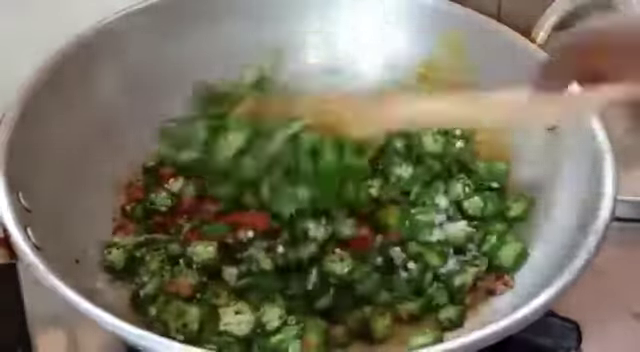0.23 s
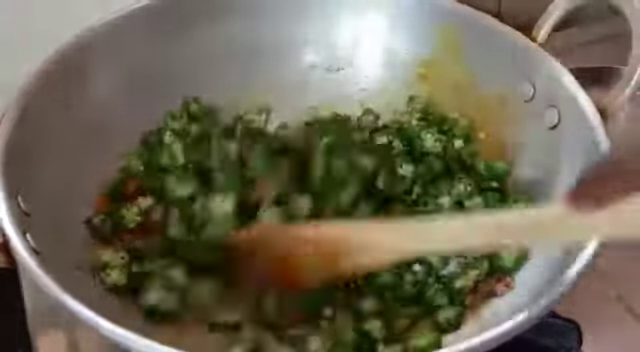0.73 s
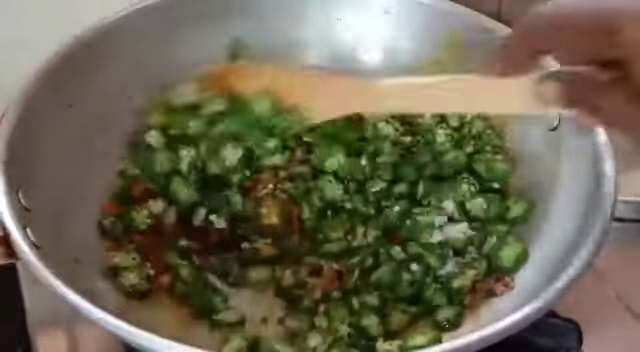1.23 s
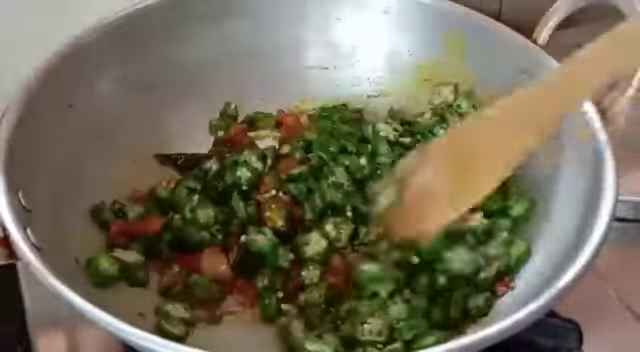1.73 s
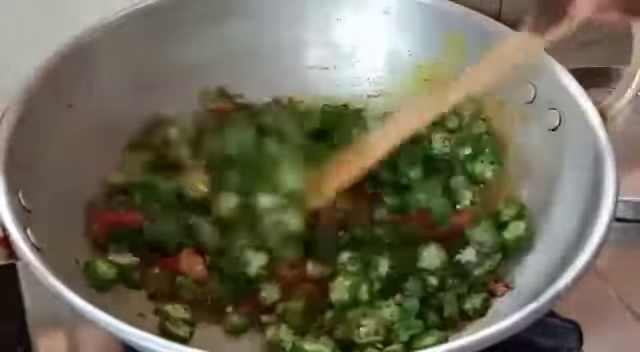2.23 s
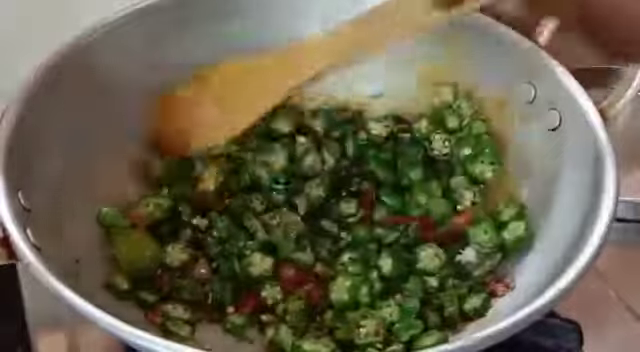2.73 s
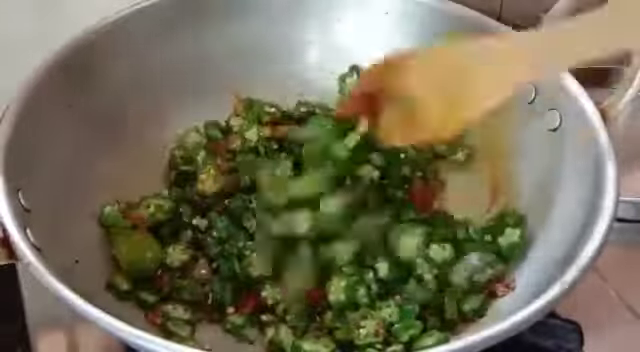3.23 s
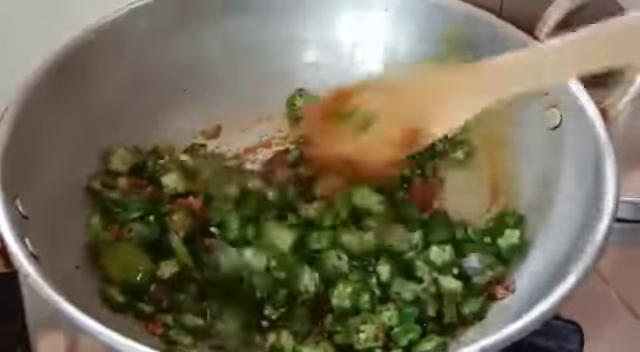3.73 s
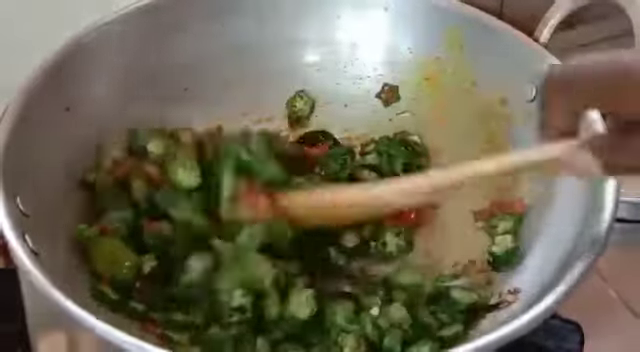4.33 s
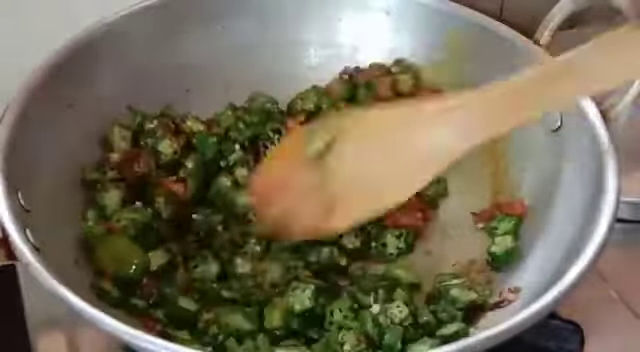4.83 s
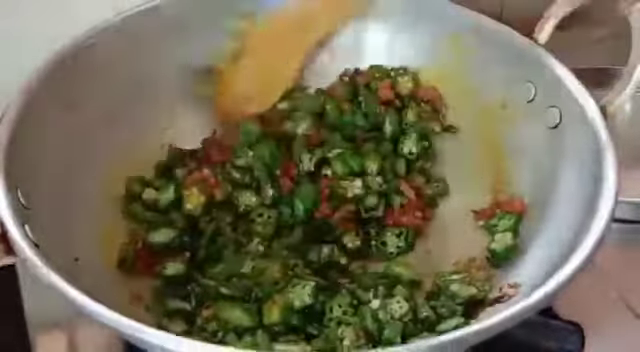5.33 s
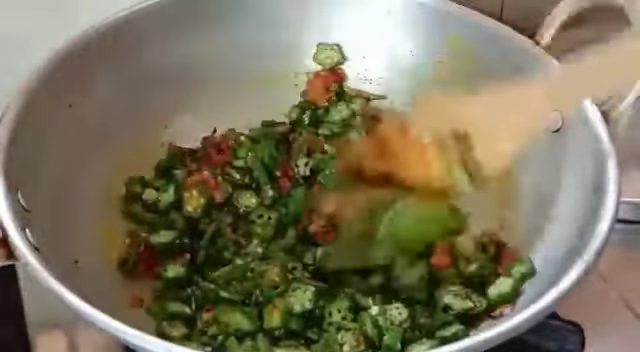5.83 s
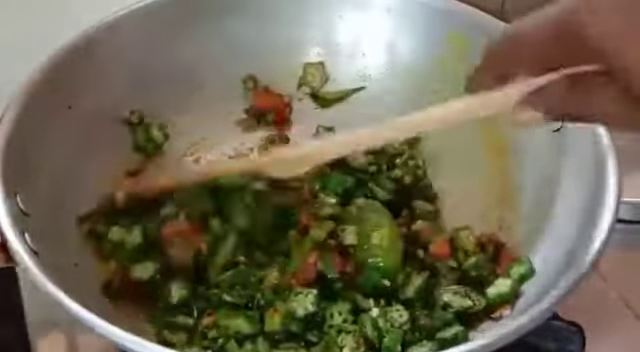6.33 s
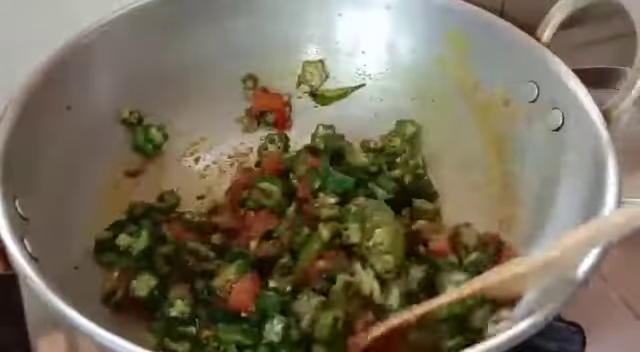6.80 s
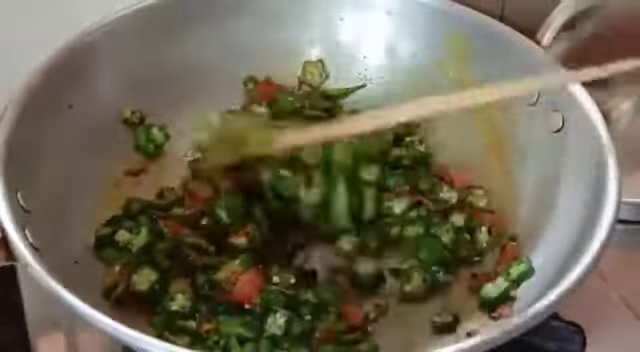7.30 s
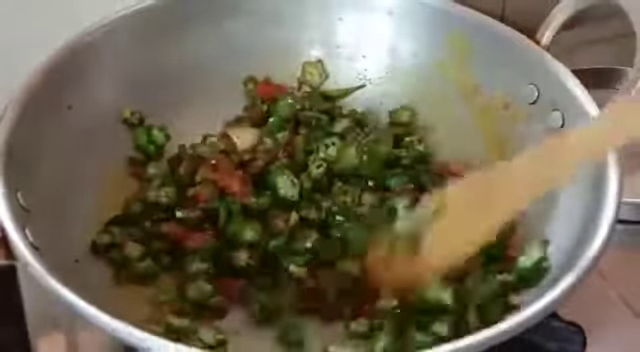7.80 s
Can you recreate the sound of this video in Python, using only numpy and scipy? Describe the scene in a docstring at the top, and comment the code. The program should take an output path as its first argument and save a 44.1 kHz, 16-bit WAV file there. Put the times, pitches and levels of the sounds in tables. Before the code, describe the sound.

Close over a kitchen stove, a wooden spatula stirs vegetables in a deep metal pan. Its edge scrapes across the metal in uneven strokes and now and then knocks it, giving a dull, short ring. The stirring eases for a while, then returns with sharper knocks. Oil sizzles softly throughout, rising as the food is turned, over a very faint hum and rumble.

```python
"""A kitchen, close over the stove: a wooden spatula stirs vegetables in a deep metal pan.
Its edge judders across the metal and now and then knocks it; both ring the pan's food-damped modes.
Oil sizzles and spits, louder where the food is turned over. A mains hum and a low rumble lie beneath,
and nearby tiles throw back a very short stereo echo."""
import sys
import numpy as np
from scipy import signal
from scipy.fft import rfft, irfft, next_fast_len
from scipy.io import wavfile
from scipy.ndimage import uniform_filter1d

SR = 44100
rng = np.random.default_rng(int(sys.argv[2]) if len(sys.argv) > 2 else 0)


def persist_wave(psi):
    """Save psi, clipped to +-1, as 16-bit WAV."""
    counts = np.round(np.clip(psi, -1, 1) * 32767).astype(np.int16)
    wavfile.write(sys.argv[1], SR, np.atleast_2d(counts).T)


N = 355446

# The ring of the loaded pan. Each row: pitch in Hz, ring time (t60) in seconds, gain in dB.
PAN_MODES = [(99, 0.16, -13.5), (146, 0.034, -11), (197.2, 0.13, -3.5), (228.6, 0.048, -6.5),
             (269, 0.11, -5), (314, 0.076, -10), (327.8, 0.083, -6.5), (372, 0.32, -18),
             (408.3, 0.13, -13.5), (439.5, 0.2, -12), (477.6, 0.16, -15.5), (561, 0.037, -11.5),
             (594.4, 0.063, -12), (642, 0.048, -9), (681.3, 0.046, -9), (794, 0.057, -10.5),
             (839.5, 0.12, -11), (849.4, 0.068, -10), (887, 0.048, -10), (996, 0.025, -15.5),
             (1078, 0.083, -16.5), (1113, 0.037, -18), (1222, 0.019, -15.5), (1210, 0.017, -23),
             (1369, 0.054, -21), (1544, 0.029, -20.5), (1809, 0.015, -24.5)]
# Spatula strokes. Each row: moment of full pressure in seconds, nominal swell in ms, hold in ms,
# nominal fade in ms, then peak drive in dB for the low, middle and high modes and for fresh sizzle.
STROKES = [(0.0, 50, 68, 170, -46, -41.5, -47.5, -51.5), (0.27, 670, 300, 200, -76.5, -73, -60, -64),
           (0.771, 72, 61, 150, -36, -32.5, -40.5, -51), (0.892, 150, 38, 143, -36.5, -29.5, -33, -50),
           (0.958, 100, 38, 95, -53, -40.5, -42, -54), (1.18, 170, 110, 200, -79, -56.5, -53, -62.5),
           (1.358, 89, 10, 100, -64, -58, -76, -67), (1.498, 160, 26, 78, -84, -88, -61.5, -69),
           (1.68, 110, 57, 100, -78, -70, -74, -61), (1.743, 65, 14, 160, -50, -42.5, -52, -56.5),
           (2.138, 70, 53, 150, -80, -68, -69, -55), (2.245, 120, 22, 66, -57, -61.5, -52.5, -54),
           (3.049, 68, 100, 85, -63, -54, -62, -63.5), (3.11, 60, 27, 110, -60, -51.5, -68, -61),
           (3.424, 29, 35, 200, -60, -41.5, -40.5, -55), (3.788, 102, 14, 88, -49, -52.5, -50, -60),
           (3.96, 39, 47, 180, -66, -51.5, -51.5, -59), (4.309, 26, 79, 80, -46.5, -42.5, -44, -53),
           (4.533, 83, 21, 155, -48.5, -40, -45, -55), (4.688, 110, 78, 130, -60, -70.5, -66.5, -71),
           (5.08, 130, 74, 170, -63, -55.5, -56, -67), (5.198, 100, 35, 100, -68, -62, -58.5, -69),
           (5.334, 73, 40, 190, -70, -47, -50, -57), (5.43, 60, 15, 100, -66, -56, -55.5, -57),
           (5.555, 24, 62, 140, -39.5, -37, -43, -53), (5.772, 43, 19, 150, -72, -53.5, -68, -71),
           (6.078, 18, 10, 105, -62, -45, -39.5, -53.5), (6.158, 80, 46, 120, -70, -65, -53, -63),
           (6.488, 80, 26, 134, -47, -42, -45, -52.5), (6.81, 160, 36, 140, -54, -54.5, -54, -67),
           (6.92, 160, 36, 200, -71, -59.5, -65, -61.5), (7.08, 450, 45, 160, -69, -67, -56.5, -56),
           (7.158, 79, 25, 198, -36.5, -35.5, -37.5, -53), (7.238, 120, 45, 70, -67, -42.5, -50.5, -56.5),
           (7.768, 186, 67, 160, -50, -53.5, -56, -52), (7.851, 46, 80, 150, -34.5, -37, -41, -50.5),
           (7.952, 100, 53, 200, -42, -41.5, -45.5, -53.5)]
# Sharp accents in the stirring: knocks and sudden surges within a scrape.
# Each row: start in seconds, then the strength in dB of jolt, tick and low thud.
ACCENTS = [(0.038, -44, -60, -43), (0.746, -39, -64, -49), (0.802, -31, -57, -48), (1.721, -43, -66, -60),
           (3.045, -45.5, -64, -55), (3.419, -34, -33, -50), (3.532, -47, -49, -75),
           (3.957, -41.5, -41.5, -73), (4.308, -41.5, -43.5, -57), (4.346, -35.5, -47, -37),
           (4.533, -33.5, -43, -41), (5.323, -50, -64, -63), (5.552, -33.5, -55, -34.5),
           (5.75, -50.5, -65, -50), (6.077, -36.5, -36.5, -47), (6.46, -48, -63, -44),
           (6.806, -44.5, -51, -67), (7.059, -51, -58, -70), (7.113, -41, -42, -40),
           (7.155, -35.5, -60, -37), (7.81, -52, -59, -42), (7.841, -35.5, -40, -42)]
# Food settling between strokes: drive in dB for the low, middle and high modes.
SETTLING_DB = [-78, -73.5, -74]
# Four edges in Hz: low modes cross into middle over the first pair, middle into high over the second.
CROSSFADES_HZ = [250, 320, 720, 780]
# The bed of steady frying. Each row: time in seconds, level in dB.
FRYING_LEVELS = [(0, -59), (0.18, -63.5), (0.3, -57.5), (0.68, -64.5), (1.1, -63), (1.55, -63.5),
                 (1.9, -63), (2.07, -67.5), (2.33, -60), (2.65, -63), (3.2, -60.5), (3.9, -61), (4.2, -61),
                 (4.85, -64), (5.3, -62.5), (5.5, -58), (6.4, -60.5), (7.05, -61.5), (7.4, -62),
                 (7.62, -66.5), (8.06, -56.5)]
# Tone of the hot oil. Each row: frequency in Hz, gain in dB.
SIZZLE_EQ = [(880, -4), (1500, -33), (1720, -10), (1920, -9.5), (2260, -2.5), (3870, 0), (4750, -3),
             (5670, -4), (6690, -13.5), (7300, -18.5), (8540, -13.5), (9420, -17), (9990, -21),
             (11900, -26.5), (15500, -26.5)]
# The pan's hollow. Each row: pitch in Hz, ring time (t60) in seconds, gain in dB on the frying's drive.
HOLLOW_MODES = [(839, 0.084, -14.5), (884.5, 0.072, -17.5), (1216, 0.044, -19)]
# The loudest spits of oil. Each row: start in seconds, strength in dB, pitch in Hz.
OIL_SPITS = [(0.024, -49, 8220), (0.0518, -49, 8700), (0.7597, -51, 8520), (2.166, -53, 8870),
             (2.2423, -53, 8440), (4.3884, -57, 8640), (6.4727, -50, 8620), (6.4981, -54, 8130),
             (6.9386, -49.5, 8560), (7.0489, -53, 8260), (7.1097, -57, 8300), (7.1796, -54, 8270),
             (7.231, -55, 8000), (7.8201, -45.5, 8160)]
# Tone of the kitchen rumble. Each row: frequency in Hz, gain in dB.
RUMBLE_EQ = [(15, -40), (30, -13), (45, -12), (100, 5), (160, -1), (600, -13.5), (1000, -16), (1300, -25),
             (1550, -33), (2000, -23), (2600, -50)]
# Colour of the two microphone ports. Each row: frequency in Hz, left minus right in dB.
PORT_BALANCE = [(60, -1.0), (110, -1.0), (200, -1.0), (380, -1.5), (700, -0.5), (1290, 4.5), (2380, 0.0),
                (4400, 0.0), (8120, 0.0), (15000, -0.5)]
# Tone of the noise floor. Each row: frequency in Hz, gain in dB.
HISS_EQ = [(1500, -4), (3000, -1.5), (6000, -1), (8000, -17), (11500, -24.5), (13700, -38), (14600, -9),
           (15500, -6)]
# Steepness of a stroke's swell and fade, for the low, middle and high modes and the sizzle.
SWELL_SLOPES, FADE_SLOPES = [1.16, 1.43, 1.18, 0.71], [1.26, 1.11, 1.07, 0.64]


def pan(drive_db, contact_db=3.0):
    """Slips and accents shake every mode; the moving contact point favours now one, now another."""
    slips = clicks(per_s=500, scatter_db=2.5)
    jolts, thuds = accent_bursts(column=1), accent_bursts(column=3)
    out = 0
    for k, (hz, t60, db) in enumerate(PAN_MODES):
        low = np.interp(hz, CROSSFADES_HZ[:2], [1, 0])
        high = np.interp(hz, CROSSFADES_HZ[2:], [0, 1])
        stroke_db = np.array([low, 1 - low - high, high]) @ drive_db
        # tumbling food blurs the slips, for each mode in its own way
        blurred = slips + 0.58 * rng.standard_normal(N)
        rub = blurred * undb(stroke_db - 5.5 + contact_db * walk(20))
        accent = (low * thuds + (1 - low) * jolts) * undb(0.5 + 2.6 * high + contact_db * walk(20))
        out = out + (-1) ** k * undb(db) * ring(rub + accent, hz, t60)
    return butter(out, 3, 95, "high")  # a pan this small radiates little deep bass


def stirring():
    """Strokes swell, hold and fade over a resting bed: dB curves for three mode groups and the sizzle."""
    t = np.arange(0, N + 44, 44) / SR
    settling = [np.full(len(t), db) for db in SETTLING_DB]
    frying = np.interp(t, *np.transpose(FRYING_LEVELS))
    power = undb(settling + [frying]) ** 2
    for peak_s, swell_ms, hold_ms, fade_ms, *peak_db in STROKES:
        ms = 1000 * (t - peak_s)
        before = np.maximum(-ms, 0) / swell_ms
        after = np.maximum(ms - hold_ms, 0) / fade_ms
        drop_db = 30 * (np.outer(SWELL_SLOPES, before) + np.outer(FADE_SLOPES, after))
        power += undb(np.array(peak_db)[:, None] - drop_db) ** 2
    return np.array([np.interp(np.arange(N) / SR, t, db) for db in 10 * np.log10(power)])


def accent_bursts(column):
    """Each accent is a sharp attack, then a quick chatter of the blade."""
    hits = accent_impulses(column)
    decay = np.exp(-np.arange(2000) / SR / 0.0032)
    chatter = rng.standard_normal(N) * signal.fftconvolve(hits, decay)[:N]
    # wood is soft: the attack spreads over a quarter of a millisecond
    return uniform_filter1d(2 * hits + chatter, size=12)


def edge_ticks():
    """The hard wooden edge puts a short, bright crack on each accent."""
    t = np.arange(3000) / SR
    decay = np.exp(-t / 0.001) + 0.45 * np.exp(-t / 0.021)
    crack = rng.standard_normal(N) * signal.fftconvolve(accent_impulses(column=2), decay)[:N]
    return undb(2) * butter(crack, 3, [2000, 4200], "band")


def sizzle(level_db, ring_cycles=200):
    """Brief high pings and crackle over fine hiss; each third-octave flickers, the treble also as one."""
    pings = sum(ring(clicks(per_s=10, scatter_db=0.46), hz, ring_cycles / hz) * np.sqrt(hz)
                for hz in 2000 * 6 ** rng.random(72))
    hiss = rng.standard_normal(N)
    crackle = clicks(per_s=900, scatter_db=0.65)
    oil = colour(hiss + 0.72 * crackle + 0.55 * unit(pings), SIZZLE_EQ)
    out, treble_db = 0, 2 * walk(14)
    for hz in 1400 * 2 ** np.arange(0, 3.6, 1 / 3):
        band = signal.butter(2, [hz / 2 ** (1 / 6), hz * 2 ** (1 / 6)], "band", fs=SR, output="sos")
        flicker_db = 1.87 * walk(18) + (hz > 6500) * treble_db
        out = out + signal.sosfiltfilt(band, oil) * undb(flicker_db)
    return unit(out) * undb(level_db)


def hollow(sizzle_db):
    """Frying rings the hollow of the pan, with wider swings in level than the sizzle itself."""
    drive_db = sizzle_db + 0.39 * (sizzle_db - np.median(sizzle_db))
    return sum(undb(db) * ring(rng.standard_normal(N) * undb(drive_db + 6.44 * walk(7)), hz, t60)
               for hz, t60, db in HOLLOW_MODES)


def oil_spits():
    """Each spit whistles for a moment on its own high pitch."""
    out, t = np.zeros(N + 3000), np.arange(3000) / SR
    envelope = (1 - np.exp(-t / 0.0049)) * np.exp(-t / 0.0074)
    for start_s, db, hz in OIL_SPITS:
        i = int(start_s * SR)
        out[i:i + len(t)] += undb(db) * np.sin(2 * np.pi * hz * t) * envelope
    return out[:N]


def kitchen(rumble_db=-74.5, hum_hz=99.7, hum_db=-76.5):
    """Room tone: a dull rumble that swells slowly, and a wavering mains hum."""
    rumble = unit(colour(rng.standard_normal(N), RUMBLE_EQ)) * undb(rumble_db + 0.5 * walk(1.7))
    phase = 2 * np.pi * np.cumsum(hum_hz + 5 * walk(20)) / SR
    hum = np.sqrt(2) * np.sin(phase) * undb(hum_db + 2.5 * walk(10))
    return rumble + hum


def tile_echo(sound, t60=0.03):
    """Nearby tiles scatter back a tight echo: faint in the mids, stronger in the treble."""
    scatter = rng.standard_normal(4000) * undb(-60 * np.arange(4000) / SR / t60)
    dull = undb(-22) * butter(sound, 2, [250, 1900], "band")
    bright = undb(-11.5) * butter(sound, 2, 5500, "high")
    return signal.fftconvolve(dull + bright, scatter / np.linalg.norm(scatter))[:N]


def accent_impulses(column):
    """One impulse for each accent, sized by a dB column of ACCENTS."""
    x, rows = np.zeros(N), np.array(ACCENTS)
    x[(rows[:, 0] * SR).astype(int)] = undb(rows[:, column])
    return x


def clicks(per_s, scatter_db):
    """Clicks at random moments, a few larger than the rest; rms 1."""
    x = np.zeros(N)
    hit = rng.random(N) < per_s / SR
    size, sign = rng.random((hit.sum(), 2)).T
    x[hit] = undb(-scatter_db * np.log(size + .02)) * np.sign(sign - .5)
    return unit(x)


def ring(x, hz, t60):
    """One decaying mode; rms 1 when fed with white noise of rms 1."""
    r = 10 ** (-3 / (t60 * SR))
    w = 2 * np.pi * hz / SR
    return signal.lfilter([0, np.sin(w) * np.sqrt(2 * (1 - r * r))], [1, -2 * r * np.cos(w), r * r], x)


def walk(rate):
    """A smooth wobble: random values held 1 / rate seconds and slewed twice; spread near 1."""
    hold = int(SR / rate)
    steps = np.repeat(rng.standard_normal(N // hold + 1), hold)
    return 1.116 * uniform_filter1d(uniform_filter1d(steps, hold), hold)[:N]


def colour(x, table, share=1):
    """EQ through (Hz, dB) points joined on a log axis; share scales the dB curve."""
    hz, db = np.transpose(table)
    size = next_fast_len(N)
    bins_hz = np.maximum(np.fft.rfftfreq(size, 1 / SR), 1)
    gain = undb(share * np.interp(np.log(bins_hz), np.log(hz), db))
    return irfft(rfft(x, size) * gain, size)[..., :N]


def butter(x, order, hz, kind):
    return signal.sosfilt(signal.butter(order, hz, kind, fs=SR, output="sos"), x)


def undb(db):
    return 10 ** (np.asarray(db) / 20)


def unit(x):
    return x / np.sqrt(np.mean(x ** 2))


def scene():
    """Spatula, oil and room reach two close microphone ports that colour them differently."""
    *drive_db, sizzle_db = stirring()
    spatula = pan(np.array(drive_db)) + edge_ticks()
    oil = sizzle(sizzle_db) + hollow(sizzle_db) + oil_spits()
    mix = spatula + oil + kitchen()
    left, right = colour(mix, PORT_BALANCE, share=.5), colour(mix, PORT_BALANCE, share=-.5)
    echo = tile_echo(mix)  # comes from one side, so the ports hear it in opposite polarity
    return np.array([left + echo, right - echo])


def record(dry, hiss_db=-71.5, top_hz=15490):
    """Each channel adds its own faint hiss; a steep low-pass cuts the top."""
    hiss = unit(colour(rng.standard_normal(dry.shape), HISS_EQ)) * undb(hiss_db)
    return signal.sosfilt(signal.ellip(16, .3, 60, top_hz, fs=SR, output="sos"), dry + hiss)


dry = scene()
out = record(dry)
persist_wave(out)
```